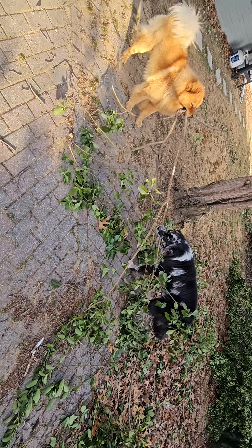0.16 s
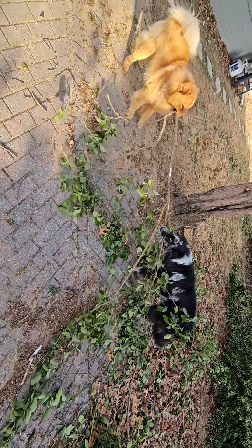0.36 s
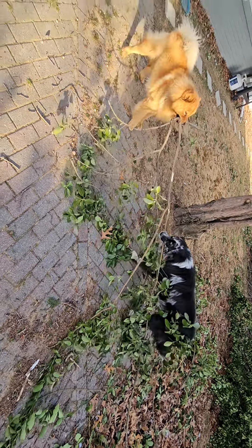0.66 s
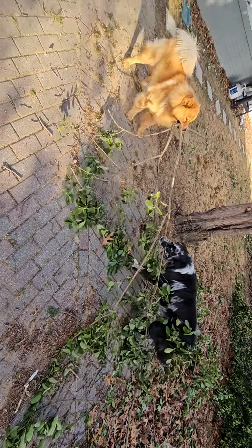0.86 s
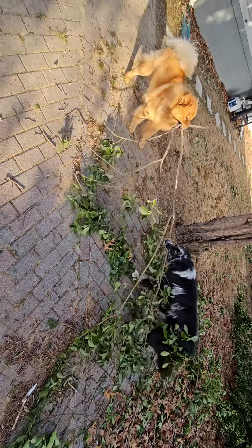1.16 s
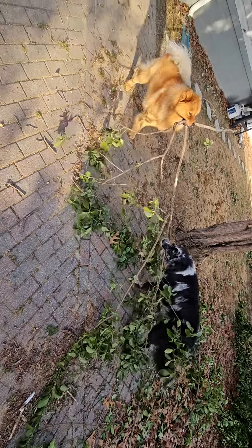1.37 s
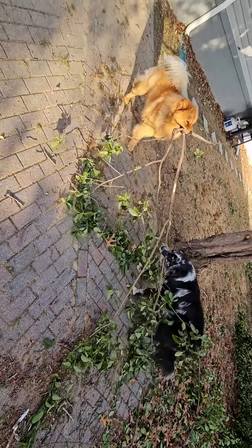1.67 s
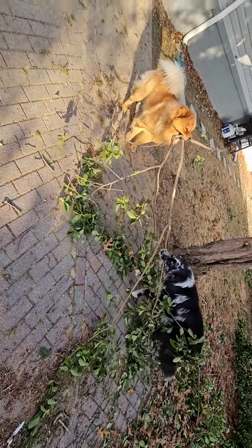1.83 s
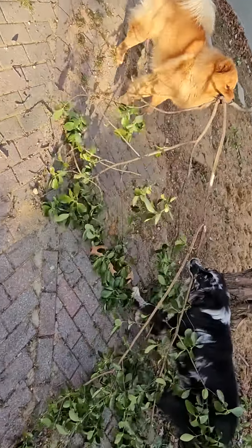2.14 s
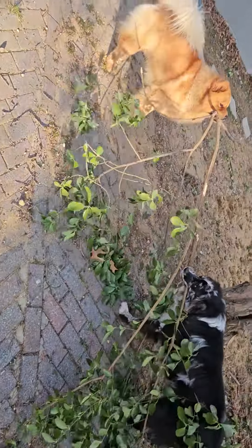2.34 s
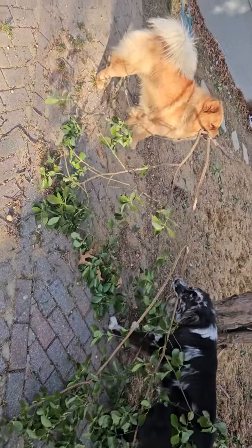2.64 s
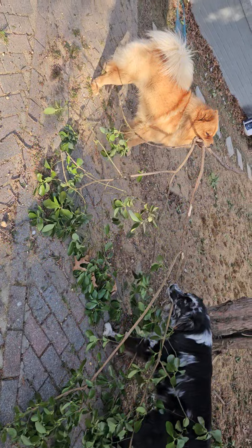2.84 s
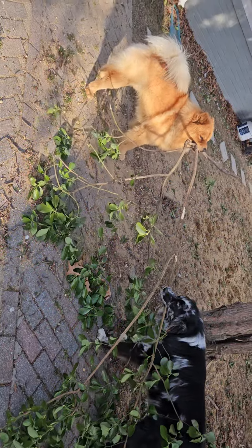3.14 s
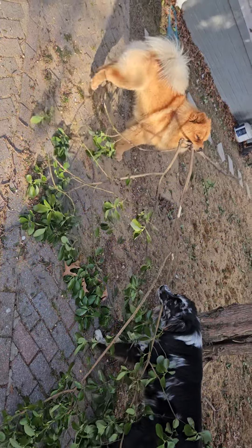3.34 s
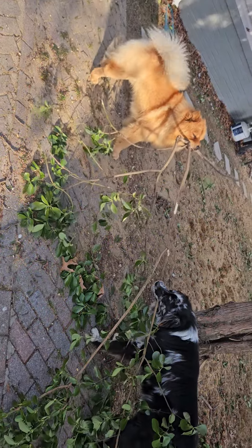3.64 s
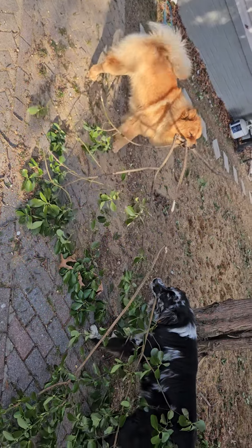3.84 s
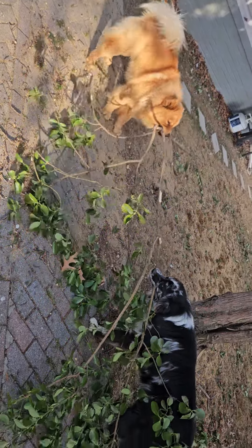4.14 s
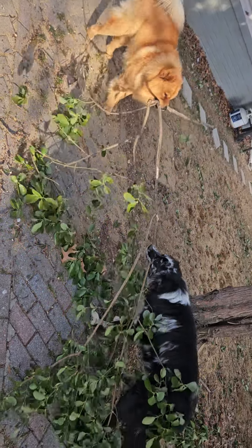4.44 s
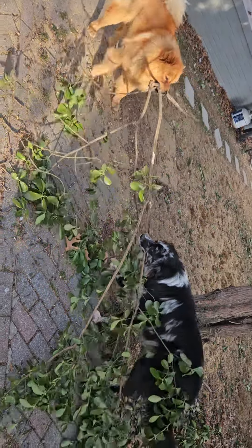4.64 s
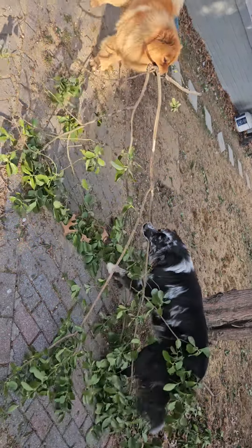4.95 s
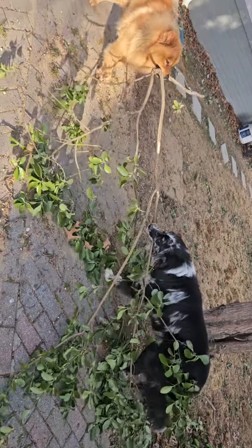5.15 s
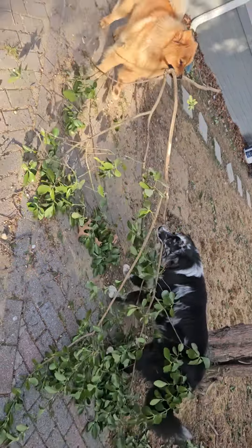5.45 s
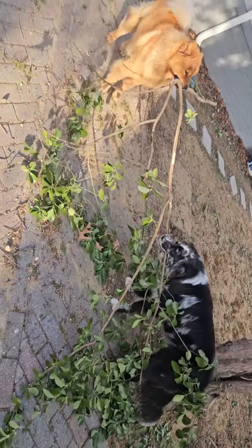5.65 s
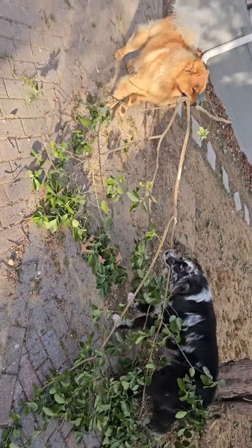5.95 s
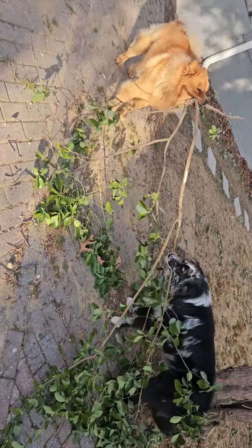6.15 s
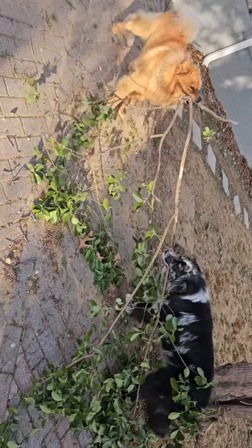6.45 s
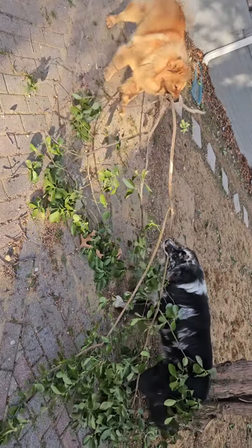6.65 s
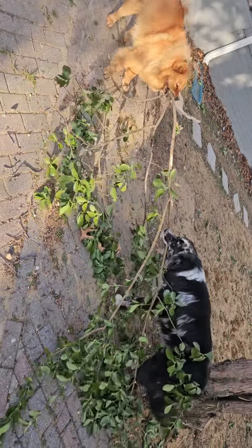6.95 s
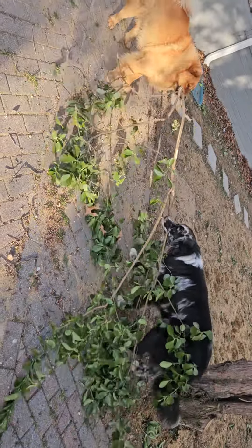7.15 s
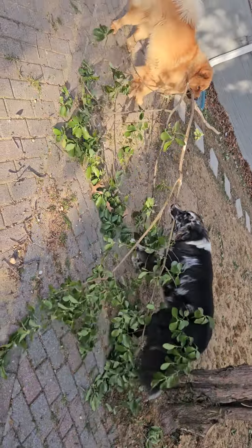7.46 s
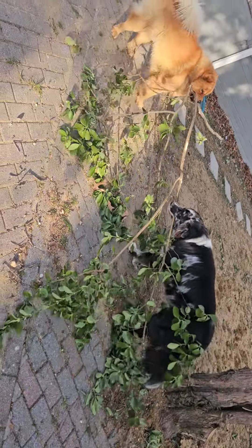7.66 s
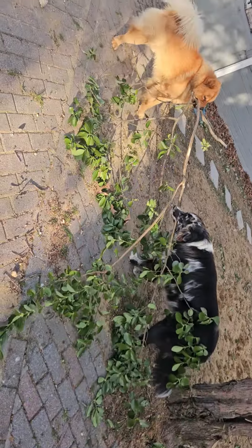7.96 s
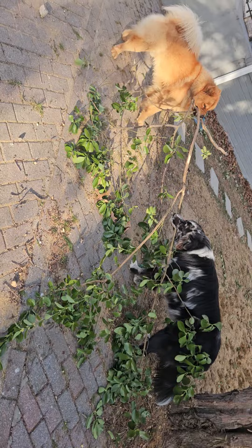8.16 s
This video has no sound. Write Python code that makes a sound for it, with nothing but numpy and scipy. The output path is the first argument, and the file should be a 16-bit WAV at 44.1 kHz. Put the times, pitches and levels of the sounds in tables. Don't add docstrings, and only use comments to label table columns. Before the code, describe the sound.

A small stereo microphone hears two dogs tugging a leafy branch a few metres away in a paved yard, with short reflections and a dull, steady low town floor. From 0 to 1.3 s a wavering, humming growl with fluttering rasp and chest rumble builds over scraping leaves, light twig ticks and faint trilled birds. At 1.25 to 2 s a harder, rattling snarl takes over, ending in a loud sharp bark near 2.1 s with a leafy swish. The growl fades until about 3.4 s; a quieter gap holds ticks and rustle. Around 4 s growling returns, with a few thin bird notes, rising into a sudden double bark at 5.3 s and a strong leaf scrape. After a lull, a low growl starts at 6.1 s, a third bark hits at 6.7 s, then a softening raspy growl dies by 8 s, leaving gentle rustling, low hum and faint birds.

```python
import sys
import numpy as np
from scipy import signal
from scipy.fft import rfft, irfft, next_fast_len
from scipy.io import wavfile
from scipy.ndimage import uniform_filter1d, minimum_filter1d

SR = 44100
rng = np.random.default_rng(int(sys.argv[2]) if len(sys.argv) > 2 else 0)


def ratio(d):
    e = np.asarray(d, float) / 20
    return 10 ** e


def wav_record(signal):
    frames = np.transpose(np.atleast_2d(signal))
    bounded = np.clip(frames, -1, 1)
    quanta = np.round(bounded * 32767).astype(np.int16)
    wavfile.write(sys.argv[1], SR, quanta)


N = 366030

# [t/s, f/Hz, level/dB]
HUMS = [
    [(0.0, 201.8, -39), (0.308, 219.4, -36.5), (0.41, 274.7, -37), (0.51, 244, -35.5), (0.6, 203, -38.5),
     (0.72, 224.2, -37.5), (0.96, 227.4, -33.5), (1.14, 251.5, -36.5), (1.32, 189.4, -34.5)],
    [(1.98, 196.9, -30.5), (2.08, 250.2, -41), (2.492, 242.4, -41), (2.548, 224.8, -41),
     (2.718, 237.3, -44), (3.234, 205.4, -41.5), (3.42, 168.8, -57.5)],
    [(4.03, 242.3, -37), (4.118, 254.8, -35.5), (4.336, 220.6, -38.5), (4.51, 262.2, -38.5),
     (4.7, 201.7, -37.5), (5.1, 237.3, -35.5), (5.19, 187, -36.5), (5.24, 222.5, -31.5), (5.28, 300, -28.5)],
    [(6.1, 102.1, -49.5), (6.316, 142.9, -49), (6.45, 214.7, -45), (6.702, 245.3, -40.5), (6.944, 218, -43),
     (7.088, 268.7, -37), (7.218, 215.5, -37.5), (7.794, 211.5, -42.5), (7.95, 165, -50)],
]
# [t/s, f/Hz, level/dB]
SLACK_HUM = [(1.32, 161.2, -46), (1.386, 190, -35.5), (1.44, 154.2, -40), (1.516, 154, -40),
             (1.636, 215, -42), (1.98, 153.2, -41)]
# [t/s, level/dB]
RUMBLE = [(0.0, -40.5), (0.55, -37.5), (0.76, -43), (1.52, -34.5), (2.26, -42), (3.83, -54.5),
          (4.28, -36.5), (4.39, -52), (4.57, -33), (4.67, -55.5), (5.06, -45), (5.15, -37.5), (5.41, -49),
          (6.08, -67), (6.15, -41.5), (6.54, -46), (6.63, -35), (8.3, -56)]
# [t/s, effort level/dB]
RASPS = [
    [(.27, -49), (.32, -47.5), (.37, -32.5), (.45, -41.5)],
    [(.4, -61), (.46, -36), (.7, -43.5), (.8, -55)],
    [(.66, -47), (.74, -43.5), (.85, -39.5), (1.08, -36), (1.25, -41.5)],
    [(1.245, -40.5), (1.263, -31.5), (1.42, -37.5), (1.96, -41.5), (2.03, -38.5)],
    [(2.18, -37), (2.6, -42.5), (2.65, -50)],
    [(2.6, -46.5), (2.67, -40.5), (3.28, -48), (3.37, -54), (3.45, -82)],
    [(3.98, -64), (4.09, -42.5), (4.47, -43), (4.55, -36), (4.64, -52.5)],
    [(4.58, -53.5), (4.65, -44.5), (4.88, -42.5), (5.2, -39), (5.24, -31.5)],
    [(6.08, -66), (6.14, -52), (6.3, -54), (6.55, -46.5), (6.67, -44)],
    [(6.84, -48), (7.02, -45), (7.08, -38)],
    [(7.05, -54), (7.11, -39.5), (7.19, -35.5), (7.28, -49.5), (7.4, -56.5)],
    [(7.26, -54), (7.4, -55.5), (7.82, -49.5), (7.95, -69)],
    [(0, -47.5), (.3, -48.5), (.35, -56)],
]
# [first f/Hz at start, first f/Hz at end, second f/Hz, third f/Hz, fourth f/Hz]
GRIPS = [(673, 590, 1250, 1800, 2340), (793, 710, 1260, 1726, 2250), (663, 680, 1186, 1810, 2200),
         (806, 803, 1360, 1710, 2200), (770, 750, 1230, 1780, 2133), (725, 750, 1230, 1820, 2200),
         (685, 732, 1426, 1770, 2160), (720, 720, 1330, 1793, 1600), (566, 658, 1280, 1730, 2110),
         (758, 790, 2500, 1200, 2160), (782, 820, 1210, 1876, 2650), (820, 810, 1240, 1880, 2600),
         (717, 660, 1500, 1650, 2100)]
# [second, third, fourth level/dB over the first, slide of their pitch/factor]
GRIP_TONE = [(-11.5, -20.5, -25, 1.03), (-11, -9, -8.5, 0.966), (-12.5, -13.5, -26.5, 1.017),
             (-11.5, -12.5, -10.5, .98), (-11, -17.5, -12, .97), (-8.5, -18, -22.5, 1.027),
             (-8, -19.5, -11, 0.94), (-10.5, -7.5, -22, 1.09), (-8, -35.5, -13, 1.064),
             (-12.5, -16.5, -12.5, 0.88), (-13.5, -7.5, -14.5, 0.997), (-11, -12.5, -29, 0.97),
             (-27, -37, -26, 0.98)]
BARKER_GRIP = 3
FLUTTER_PER_S = 23
DULLING = 0.18
# [t/s, peak level/dB]
FLAPS = [(0.334, -40), (0.362, -40), (0.406, -28), (0.462, -27), (0.624, -37), (0.665, -43), (0.703, -29.5),
         (0.754, -32), (0.794, -31), (0.836, -28.5), (0.881, -27), (0.937, -26), (1.013, -39), (1.036, -35),
         (1.07, -25), (1.143, -29), (1.199, -27.5), (2.257, -27.5), (2.385, -29), (2.617, -34.5),
         (2.64, -31.5), (2.755, -48), (2.785, -34.5), (2.842, -39.5), (2.872, -33.5), (2.931, -44),
         (2.968, -37), (3.019, -36), (3.065, -35), (3.117, -32), (3.197, -37), (3.25, -33.5), (3.331, -38),
         (3.363, -45),
         (4.023, -38), (4.252, -35), (4.309, -38.5), (4.386, -40), (4.449, -33.5), (4.513, -29.5),
              (4.549, -31), (4.592, -32), (4.63, -33.5), (4.712, -34), (4.762, -38), (4.802, -41.5),
              (4.847, -38), (4.896, -42.5), (4.943, -36), (4.987, -27.5), (5.089, -36.5), (5.158, -34),
              (5.247, -10),
         (7.052, -38), (7.079, -33), (7.153, -39), (7.174, -31.5), (7.314, -38.5), (7.352, -40),
              (7.382, -35), (7.425, -45), (7.457, -46), (7.548, -41), (7.646, -48), (7.694, -47),
              (7.844, -38)]
# [t/s, peak level/dB]
HARD_FLAPS = [(1.256, -28.5), (1.294, -25), (1.347, -27.5), (1.373, -25.5), (1.411, -28), (1.444, -33.5),
              (1.475, -31.5), (1.494, -29), (1.53, -29.5), (1.567, -32.5), (1.587, -30.5), (1.621, -32),
              (1.639, -31.5), (1.66, -29), (1.694, -30.5), (1.736, -35.5), (1.771, -38.5), (1.807, -31),
              (1.849, -32), (1.888, -35), (1.918, -35), (1.978, -41.5)]
FLAP_OPEN_S, FLAP_SHUT_S, FLAP_CREST_DB, BETWEEN_DB = .007, .011, -11, -2
HARD_SHUT_S, HARD_CREST_DB, HARD_BETWEEN_DB = .007, -5, -4
# [t/s, peak level/dB]
SLAPS = [(1.255, -27), (1.372, -22), (1.62, -27), (1.659, -22), (1.695, -23), (1.736, -29), (1.806, -28),
         (1.85, -27), (2.385, -26.5), (2.842, -30), (2.932, -32)]

# [peak t/s, level/dB, rise over 20 dB/s, fall over 20 dB/s]
TUGS = [(.42, -44, 0.09, 1), (.66, -45.5, 0.46, -0.2), (1.3, -45, 0.57, 1.5), (2.08, -37, 0.12, 0.25),
        (2.55, -53, 1, 0.5), (3.45, -67, 0.5, 0.6), (3.3, -60, .04, 0.16), (3.97, -61.5, -0.4, 1),
        (4.14, -49, -0.01, 0.86), (4.53, -46.5, 0, 0.5), (4.83, -46, .5, 0.9), (5.34, -37.5, 0.2, 0.14),
        (5.47, -56, -0.4, 0.56), (6.15, -51, 0, 0.15), (6.6, -60, -0.56, 6.7), (6.75, -44, 0.19, 0.09),
        (7.14, -48, 0.15, 0.98), (7.65, -54.5, 2.3, 0.2)]
# [peak t/s, level/dB, rise over 20 dB/s, fall over 20 dB/s]
SWISHES = [
    (.02, -60.5, 3, 1.2),
    (.25, -64.5, 0.2, 1),
    (2.85, -63.5, 2.5, 0.7),
    (8.21, -63.5, -0.1, 3),
]
# [f/Hz, level per Hz/dB]
LEAF_COLOUR = [(1470, -25), (2500, -4), (3550, -6.5), (4760, -2), (5650, -4.5), (8870, -7), (9660, -13),
               (12600, -10), (16000, -15)]
DULL_HZ = 8800
# [t/s, peak level/dB, f/Hz, left-right level/dB]
TICKS = [(0.5541, -49, 4570, -7.5), (0.5786, -47, 4580, 1.0), (0.877, -38, 4440, 0.5),
         (0.9517, -41, 4040, -2), (0.9709, -37.5, 4050, 8), (2.4457, -46, 4834, 5), (3.1358, -49, 6230, 4),
         (3.299, -37, 7200, -12), (3.3144, -46.5, 7200, -10), (3.466, -46.5, 11470, -9),
         (3.6705, -53.5, 9100, 4.5), (3.9633, -46.5, 6900, -9), (4.1084, -43, 4300, 11.5),
         (4.159, -37, 4950, 3), (4.2906, -42, 7580, -8), (4.8304, -38, 4540, -1), (5.0923, -39, 7150, -2.5),
         (5.5812, -45, 7880, 9), (5.704, -47.5, 5070, -5.5), (5.952, -54, 4500, -4.5),
         (7.2674, -41.5, 4930, 0.0)]
# [t/s, length/s, start f/Hz, end f/Hz, level/dB]
TRILLS = [(.078, 0.058, 2760, 2860, -58), (.224, 0.069, 2860, 2820, -52), (.228, 0.065, 2500, 2510, -57.5),
          (.145, 0.13, 8440, 8400, -72), (.26, 0.078, 7360, 7340, -68), (2.485, 0.052, 3200, 2720, -56.5),
          (5.646, 0.022, 8840, 8600, -58.5), (5.657, .05, 8020, 7830, -61.5),
          (8.159, 0.09, 6500, 6230, -71), (8.261, 0.038, 2520, 2610, -63) ]
# [t/s, length/s, start f/Hz, end f/Hz, level/dB]
WHISTLES = [(.148, 0.033, 3750, 3430, -57.5), (.175, 0.11, 3470, 3450, -70),
            (3.86, 0.036, 1403, 1154, -66.5), (3.995, 0.059, 3000, 3070, -64.5),
            (4.047, 0.06, 3110, 2300, -61), (4.655, .024, 2980, 2610, -62),
            (4.71, 0.044, 2450, 2760, -58.5), (4.777, 0.11, 3470, 2130, -58)]
TRILL_PER_S = 52
# [f/Hz, level per Hz/dB]
TOWN = [(12, -11.5), (24, 3), (79, -1), (98, 1), (163, -1.5), (228, -40.5), (367, -9), (542, -27),
        (849, -20), (1030, -44), (1120, -22.5), (1440, -28.5), (1610, -30), (16000, -80)]
TOWN_DB = -47

# [t/s, effort level/dB, f/Hz]
BARKS = [
    [(2.02, -33.5, 372.3), (2.045, -21.5, 398), (2.066, -13.5, 362.7), (2.071, -20.5, 331.2),
     (2.082, -6.5, 316.8), (2.104, -10.5, 372.2), (2.128, -13, 324), (2.136, -29, 392.4), (2.2, -34.5, 401)],
    [(5.232, -39, 381), (5.25, -25.5, 400.3), (5.26, -23, 309.7), (5.277, -6, 323.5), (5.3, -14, 425.4),
     (5.316, -18.5, 440)],
    [(5.3, -23.5, 290.5), (5.314, -14.5, 289.4), (5.325, -10.5, 292.8), (5.36, -18.5, 292),
     (5.383, -26.5, 284.4), (5.4, -40.5, 280.8), (5.5, -50, 270), (5.7, -64, 260)],
    [(6.655, -41.5, 379.7), (6.7, -19.5, 353.5), (6.713, -24, 321), (6.722, -10.5, 325.3),
     (6.745, -15, 363.6), (6.768, -15, 329), (6.775, -27, 378.5), (6.794, -23.5, 391), (6.815, -46, 372)],
]
# [brightness/dB, slack-mouth flare/dB, teeth hiss/dB, chest note/dB, cheeks/dB,
# tilt per resonance/dB, dulling after the peak/dB per s]
BARK_VOICE = [(-4.5, -0.5, -3.5, -6.5, -9.5, 0.5, -130), (-3.5, -31, -6, 0, -9, 0, -58),
              (-2.5, -30, 2.5, -10.5, -8.5, -0.5, -9), (-5.5, 7.5, 1, -4, -6, 0.5, -70)]
CLEAN_DB = [-14, -14, -11, -22]
# [f/Hz, width/Hz, level/dB]
LOW_MOUTH = [(353, 73, -9.5), (714, 150, 5)]
# [f/Hz, width/Hz, level/dB]
HIGH_MOUTH = [(1344, 260, 2), (1598, 280, 5), (1950, 220, -4), (2146, 230, 2.5), (2398, 97, -9)]
# [f/Hz, width/Hz, level/dB]
CHEEKS = [(533.7, 130, -1), (861, 113, -6)]
# [f/Hz, width/Hz, level/dB]
TEETH = [(4050, 340, -39.5), (4740, 330, -29.5), (5680, 270, -33), (6064, 770, -30.5)]
CLEAN_ROUGH, ROUGH_PER_DB, LOOSE_ROUGH = .04, .05, .9
TIGHTEN_S = .01
MOUTH_HZ, MOUTH_FOLLOW = 346, 0.96
CLOSING, BREATHY = 5.3, 0.41
TRAP_HZ, TRAP_WIDTH, TRAP_SHARE = 1090, 260, .75
MOUTH_TOP_HZ, SPENT_DB = 2650, -26

# [f/Hz, left-right level/dB, left lead/rad]
GROWLER_PORTS = [(100.7, 0, -.15), (340, 0.9, 0.29), (520, 3.2, 0.71), (860, -4.5, 0.88), (1240, 5, 1),
                 (1700, 0.8, 0.81), (2200, -4.5, .5), (3000, -2, .3)]
# [f/Hz, left-right level/dB, left lead/rad]
BARKER_PORTS = [(300, -0.5, -0.2), (600, 1, 0), (851, -2.1, .1), (1195, 2.5, -.25), (1500, 3.5, -0.18),
                (1800, 0, -0.73), (2300, -1.5, -0.43), (6000, 2, -0.42)]
# [f/Hz, likeness 0..1]
SAME = [(30, 1), (250, 0.94), (1000, 0.28), (3000, 0.17), (8000, 0.067)]
# [f/Hz, t60/s]
YARD = [(200, .4), (600, .3), (1500, .38), (3000, .3), (8000, .2)]
CEILING, EDGE_HZ = .97, 15720


def evened(x):
    return x / np.sqrt(np.mean(x ** 2) + 1e-20)


def read(points, hz):
    f, value = np.transpose(points)
    return np.interp(np.log(hz + 1), np.log(f + 1), value)


def add(mix, s, sound):
    part = mix[..., max(round(s * SR), 0):][..., :sound.shape[-1]]
    part += sound[..., :part.shape[-1]]


def columns(rows):
    s, *rest = np.transpose(rows)
    t = np.arange(s[0], s[-1], 1 / SR)
    return s[0], [np.interp(t, s, c) for c in rest]


def wander(count, hz):
    lowpass = signal.butter(2, hz, fs=SR, output="sos")
    return evened(signal.sosfilt(lowpass, rng.standard_normal(count + 4000))[4000:])


def resonate(x, hz, width):
    turn = np.exp(2j * np.pi * np.cumsum(hz * np.ones(len(x))) / SR)
    r = np.exp(-np.pi * width / SR)
    return 2 * (turn * signal.lfilter([(1 - r) ** 2], [1, -2 * r, r * r], x / turn)).real


def likeness(hz):
    same = np.clip(read(SAME, hz), 0, 1)
    return same, np.sqrt(1 - same ** 2)


def hiss(colour, patchy_db, flicker_db):
    frames, hz = N // 128 + 5, np.fft.rfftfreq(512, 1 / SR)
    a, b, c, d, patches = rng.standard_normal((frames, 257, 5)).T
    patches = uniform_filter1d(patches, size=8, axis=0)
    patches = evened(uniform_filter1d(patches, size=16, axis=1))
    flicker = evened(uniform_filter1d(rng.standard_normal(frames), size=6))
    same, apart = likeness(hz[:, None])
    left = a + 1j * b
    z = np.array([left, same * left + apart * (c + 1j * d)])
    z *= ratio(read(colour, hz)[:, None] + patchy_db * patches + flicker_db * flicker)
    return signal.istft(z, nperseg=512, noverlap=384)[1][:, :N]


def hum(rows, waver=.034, throb_db=2.2):
    s, (hz, db) = columns(rows)
    turns = 2 * np.pi * np.cumsum(hz * (1 + waver * wander(len(hz), 46))) / SR
    tone = np.sin(turns) + ratio(-24) * np.sin(2 * turns)
    level = np.sqrt(2) * ratio(db + throb_db * wander(len(hz), 60))
    return s, level * tone * signal.windows.tukey(len(hz), .08)


def pulses(count, rate, jitter, spread_db, clump_db, air):
    turns = np.cumsum(rate * np.exp(jitter * wander(count, 60))) / SR
    strength = ratio(spread_db * np.clip(rng.standard_normal(count), -2, 1.5))
    slaps = np.diff(np.floor(turns), prepend=0) * strength
    puffs = np.exp(-(turns % 1) / .5) * rng.standard_normal(count)
    return (evened(slaps) + air * evened(puffs)) * ratio(clump_db * wander(count, 28))


def rumble():
    s, (db,) = columns(RUMBLE)
    drive = pulses(len(db), rate=48, jitter=.5, spread_db=2, clump_db=.8, air=1.4)
    chest = resonate(drive, 163, 80) - ratio(-2.5) * resonate(drive, 95, 70)
    chest = chest + ratio(-14) * resonate(drive, 235, 90)
    return s, ratio(db) * evened(chest)


def flaps(s, count, hard):
    out, t = np.zeros(N), np.arange(2600) / SR
    shut, crest_db = (HARD_SHUT_S, HARD_CREST_DB) if hard else (FLAP_SHUT_S, FLAP_CREST_DB)
    closing = np.exp(-(np.maximum(t - FLAP_OPEN_S, 0) / shut) ** 2 / 2)
    shape = np.minimum(t / FLAP_OPEN_S, 1) * closing
    for at, db in HARD_FLAPS if hard else FLAPS:
        add(out, at, ratio(db + crest_db) * shape)
    return out[round(s * SR):][:count]


def rasp(rows, grip, tone, hard):
    s, (db,) = columns(rows)
    count = len(db)
    start_hz, end_hz, *upper = grip
    *over_db, slide = tone
    first = np.linspace(start_hz, end_hz, count)
    slid = slide ** np.linspace(0, 1, count) * (1 + .018 * wander(count, 9))
    flap = 2 * np.pi * np.cumsum(FLUTTER_PER_S * (1 + .12 * wander(count, 8))) / SR
    drive = pulses(count, rate=160, jitter=.35, spread_db=1.6, clump_db=.6, air=.9)
    drive = drive * ratio(.8 * (np.sin(flap) + .2 * np.sin(2 * flap)))
    low = resonate(drive, first, 170) - ratio(-9.0) * resonate(drive, .67 * first, 200)
    low = low + ratio(-10.5) * resonate(drive, 385, 150)
    high = np.zeros(count)
    for k, (gain_db, hz, width) in enumerate(zip(over_db, upper, (200, 230, 260))):
        high += (-1) ** k * ratio(gain_db) * evened(resonate(drive, hz * slid, width))
    between = ratio(db + (HARD_BETWEEN_DB if hard else BETWEEN_DB))
    fall_db = db - db.max()
    level = np.hypot(between, flaps(s, count, hard) * np.minimum(ratio(fall_db + 16.5), 1))
    mouth = evened(low) + ratio(DULLING * fall_db + 1.0) * high
    return s, level * mouth * signal.windows.tukey(count, .025)


def pull(tugs):
    t = np.arange(0, N / SR + .01, .004)
    power = np.zeros(len(t))
    for s, db, rise, fall in tugs:
        lost = np.maximum((s - t) / max(rise, .03), (t - s) / max(fall, .03))
        power += ratio(2 * (db - 20 * np.clip(lost, 0, 5)))
    return np.interp(np.arange(N) / SR, t, np.sqrt(power))


def leaves():
    scrape = hiss(LEAF_COLOUR, patchy_db=1.1, flicker_db=1.5)
    crackle = ratio(5.6 * np.minimum(rng.exponential(1, (2, N)), 5))
    crackle = crackle * (rng.random((2, N)) < 220 / SR)
    crackle = signal.lfilter([1], [1, -.97], crackle + .8 * crackle[::-1])
    near = evened(scrape * (1 + .3 * evened(crackle)))
    far = signal.sosfilt(signal.butter(8, DULL_HZ, fs=SR, output="sos"), near[:, ::-1])
    return (pull(TUGS) * near + pull(SWISHES) * far) * ratio([[.4], [-.4]])


def town():
    return ratio(TOWN_DB) * evened(hiss(TOWN, patchy_db=.7, flicker_db=.4))


def birds():
    out = np.zeros(N)
    for notes, trill in ((TRILLS, TRILL_PER_S), (WHISTLES, 0)):
        for s, length, start_hz, end_hz, db in notes:
            t = np.arange(0, length, 1 / SR)
            turns = 2 * np.pi * trill * t
            shape = signal.windows.tukey(len(t), .4) * (1 + 1.8 * np.cos(turns))
            hz = end_hz + (start_hz - end_hz) * (1 - t / length) ** 1.4
            hz = hz + 110 * np.sin(turns) + 45 * wander(len(t), 83)
            whistle = np.sin(2 * np.pi * np.cumsum(hz) / SR)
            add(out, s, ratio(db + 2.0 * wander(len(t), 60)) * shape * whistle)
    return out


def ticks():
    out, t = np.zeros((2, N)), np.arange(900) / SR
    snaps = signal.lfilter([1, -1], [1, -.4], rng.standard_normal((len(TICKS), len(t))))
    shape = ratio(-60 * t / .025) * np.minimum(t / .0015, 1)
    for (s, db, hz, pan_db), snap in zip(TICKS, snaps):
        tick = (snap + .7 * evened(resonate(snap, hz, 1500))) * shape
        add(out, s, ratio(db - 4.5) * tick * ratio([[pan_db / 2], [-pan_db / 2]]))
    return out


def slap(row):
    s, db = row
    t = np.arange(900) / SR
    gains_db, t60s = (-4.5, -5.5, -15.5, -8.0), (.025, 0.0055, 0.0151, 0.011)
    rings = np.zeros(len(t))
    for hz, gain_db, t60 in zip(GRIPS[BARKER_GRIP][1:], gains_db, t60s):
        rings += ratio(gain_db - 60 * t / t60) * np.sin(2 * np.pi * hz * t)
    return s, ratio(db + 1.5) * rings * np.minimum(t / 0.0017, 1)


def bark(rows, clean_db, bright_db, flare_db, teeth_db, chest_db, cheek_db, tilt_db, fade_db):
    s, (db, hz) = columns(rows)
    count = len(db)
    at = np.arange(count)
    late_db = np.interp(at - TIGHTEN_S * SR, at, db)
    slack_db = np.maximum(clean_db - np.minimum(db, late_db), 0)
    rough = np.clip(CLEAN_ROUGH + ROUGH_PER_DB * slack_db, 0, LOOSE_ROUGH)
    turns = np.cumsum(hz * (1 + .08 * rough * wander(count, 120))) / SR
    folds = sum(np.cos(2 * np.pi * k * turns) for k in range(1, 22))
    puffs = (.4 + np.exp(-(turns % 1) / .3)) * rng.standard_normal(count)
    air = evened(puffs)
    drive = (1 - rough) * evened(folds) * 0.16 + rough * air

    mouth = (hz / MOUTH_HZ) ** MOUTH_FOLLOW
    (chest_hz, chest_width, chest_gain), (first_hz, first_width, first_gain) = LOW_MOUTH
    low = ratio(chest_gain + chest_db) * resonate(drive, chest_hz * mouth, chest_width)
    low = low - ratio(first_gain) * resonate(drive, first_hz * mouth, first_width)
    cheeks = sum(ratio(g) * resonate(air, f, w) for f, w, g in CHEEKS)
    low = low + ratio(first_gain + cheek_db) * cheeks * np.sqrt(rough)

    upper = mouth ** .22
    breathy_drive = drive + BREATHY * np.sqrt(rough) * air
    high = np.zeros(count)
    for k, (f, width, gain_db) in enumerate(HIGH_MOUTH):
        gain = (-1) ** k * ratio(gain_db + tilt_db * k) * np.minimum(upper, 1) ** (CLOSING * k)
        high += gain * resonate(breathy_drive, f * upper, width)

    low, high = (b - TRAP_SHARE * resonate(b, TRAP_HZ, TRAP_WIDTH) for b in (low, high))
    band = signal.butter(6, (TRAP_HZ + 90, MOUTH_TOP_HZ), "bandpass", fs=SR, output="sos")
    high = signal.sosfilt(band, high)
    low, high = (b / np.sqrt(abs(uniform_filter1d(b ** 2, size=900)) + 1e-9) for b in (low, high))
    teeth = sum(ratio(g) * evened(resonate(puffs, f, w)) for f, w, g in TEETH)
    gape = rough * np.clip((mouth - 1) * 10, 0, 1) * (late_db > db)
    flare = gape * evened(resonate(puffs, 2650, 300))
    top = high + ratio(flare_db) * flare + ratio(teeth_db) * (1 + 2.5 * rough) * teeth
    bright_db = bright_db + np.maximum(fade_db * np.maximum(at - db.argmax(), 0) / SR, -8)
    bright_db = bright_db + .06 * np.minimum(db - SPENT_DB, 0)
    return s, ratio(db) * (low + ratio(bright_db) * top) * signal.windows.tukey(count, .05)


def ports(x, place):
    size = next_fast_len(N)
    hz, (at_hz, db, lead) = np.fft.rfftfreq(size, 1 / SR), np.transpose(place)
    tilt = ratio(np.interp(hz, at_hz, db) / 2) * np.exp(.5j * np.interp(hz, at_hz, lead))
    return irfft(rfft(x, size) * np.array([tilt, 1 / tilt]), size)[:, :N]


def yard(x):
    taps = np.zeros((2, 24000))
    at = np.arange(300, 23980, 20) + rng.integers(0, 20, (2, 1184))
    np.put_along_axis(taps, at, rng.choice([-1., 1.], at.shape), 1)
    hz, t, z = signal.stft(taps, SR, nperseg=256)
    decay = ratio(-60 * t / read(YARD, hz)[:, None])
    tail = signal.istft(z * decay, SR, nperseg=256)[1]
    same, apart = likeness(np.fft.rfftfreq(tail.shape[1], 1 / SR))
    left, other = rfft(tail)
    tail = irfft(np.array([left, same * left + apart * other]), tail.shape[1])
    return signal.oaconvolve(x[None], tail / np.linalg.norm(tail[0]), axes=1)[:, :N]


def scene():
    growler, barker, far = np.zeros(N), np.zeros(N), birds()
    rasps = []
    for k, (rows, grip, tone) in enumerate(zip(RASPS, GRIPS, GRIP_TONE)):
        rasps.append(rasp(rows, grip, tone, hard=k == BARKER_GRIP))
    barker_voices = [rasps.pop(BARKER_GRIP), hum(SLACK_HUM, waver=.16)]
    barker_voices += [slap(row) for row in SLAPS]
    for rows, clean_db, voice in zip(BARKS, CLEAN_DB, BARK_VOICE):
        barker_voices.append(bark(rows, clean_db, *voice))
    for voice in [hum(rows) for rows in HUMS] + rasps + [rumble()]:
        add(growler, *voice)
    for voice in barker_voices:
        add(barker, *voice)
    dogs = ports(growler, GROWLER_PORTS) + ports(barker, BARKER_PORTS)
    echoes = yard(ratio(-11.0) * (growler + barker) + ratio(-2.5) * far)
    return dogs + far * ratio([[2.5], [-2.5]]) + echoes + leaves() + ticks() + town()


def low_pass(x):
    return signal.sosfilt(signal.butter(12, 16390, fs=SR, output="sos"), x)


def record(dry):
    room = minimum_filter1d(np.minimum(CEILING / (abs(dry).max(0) + 1e-9), 1), size=301)
    limited = dry * uniform_filter1d(room, size=151)
    edge = signal.firwin(401, EDGE_HZ, window=("kaiser", 8), fs=SR)
    return low_pass(signal.oaconvolve(limited, edge[None], "same"))


dry = scene()
out = record(dry)
wav_record(out)
```